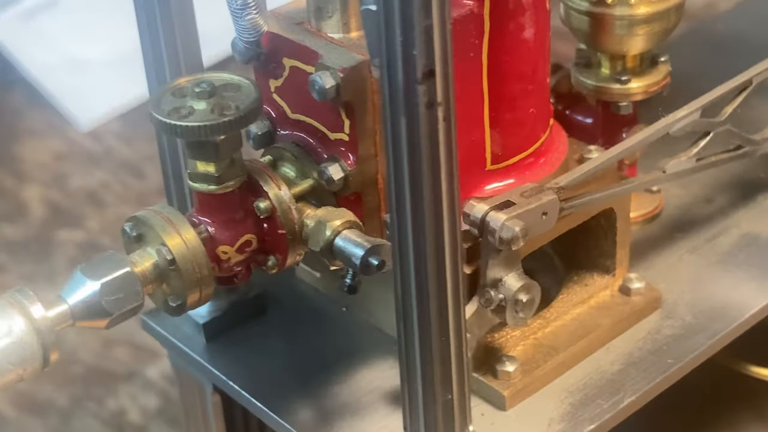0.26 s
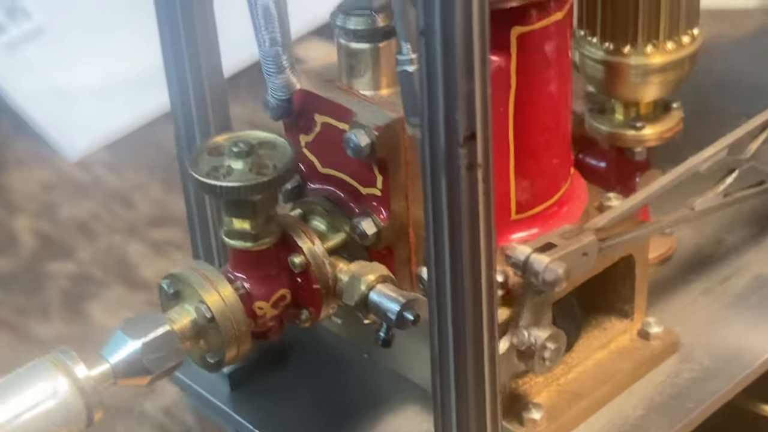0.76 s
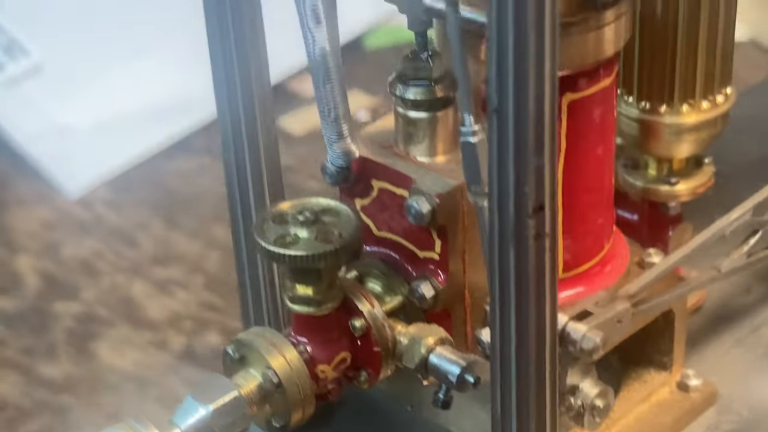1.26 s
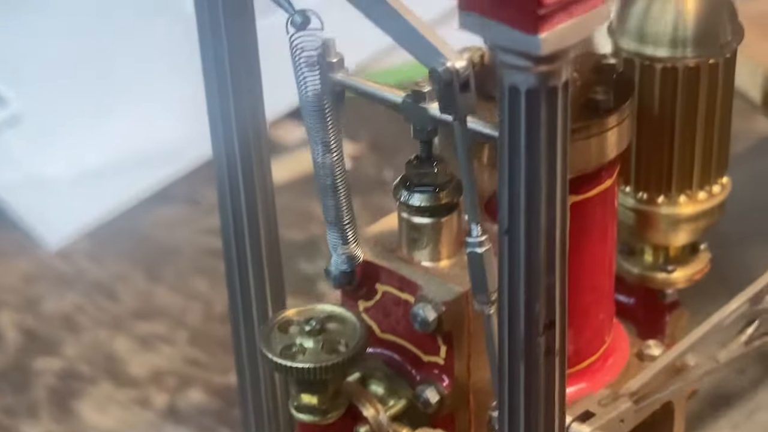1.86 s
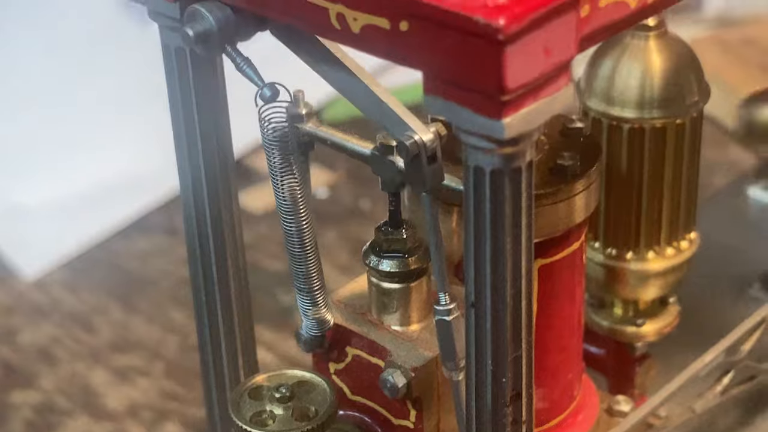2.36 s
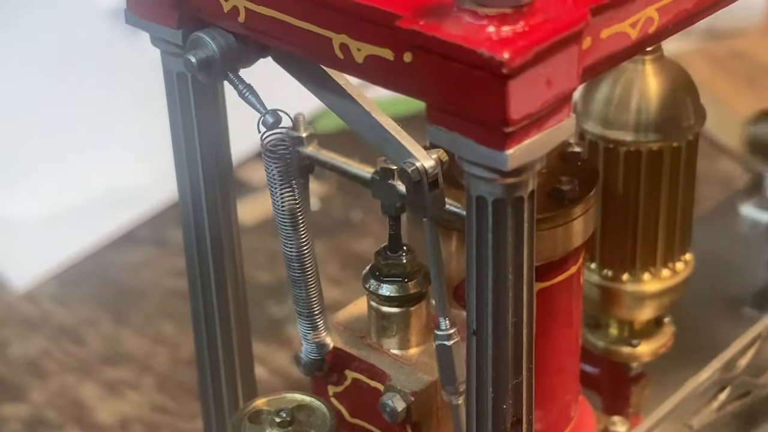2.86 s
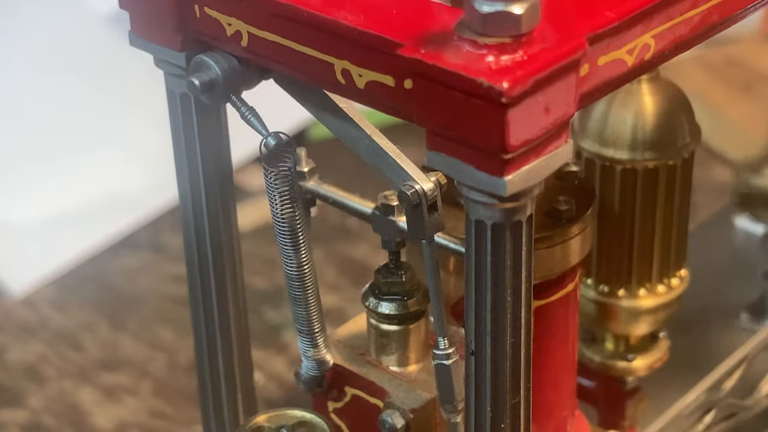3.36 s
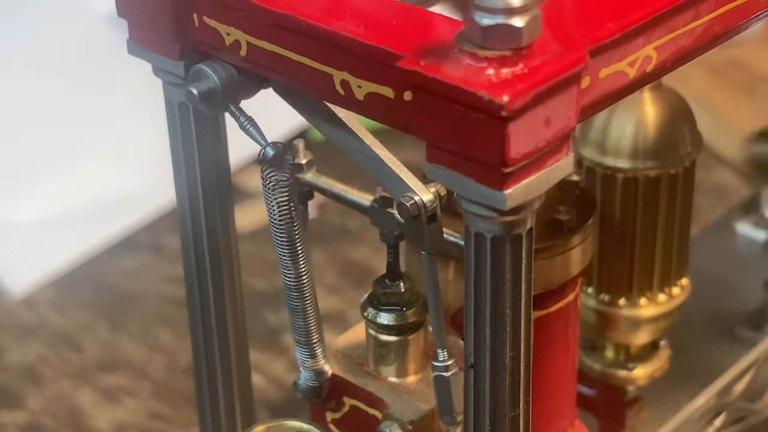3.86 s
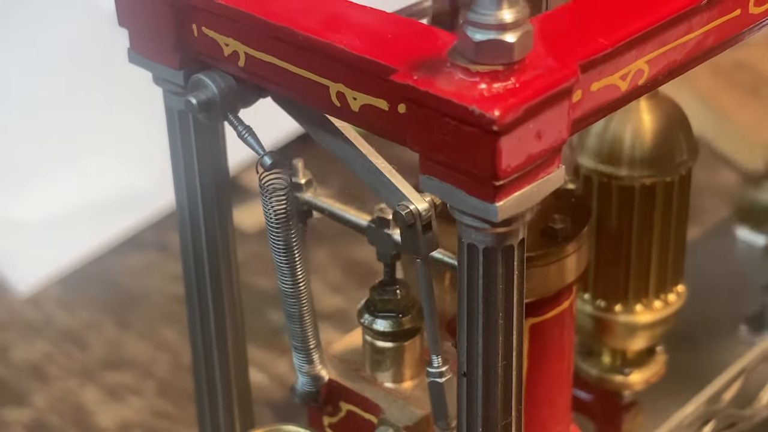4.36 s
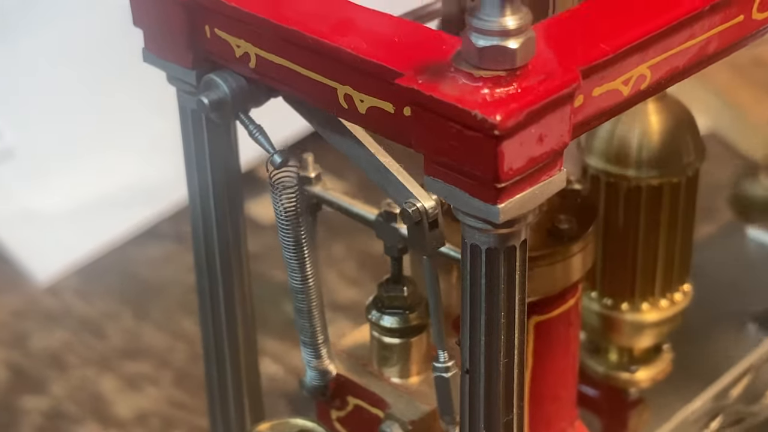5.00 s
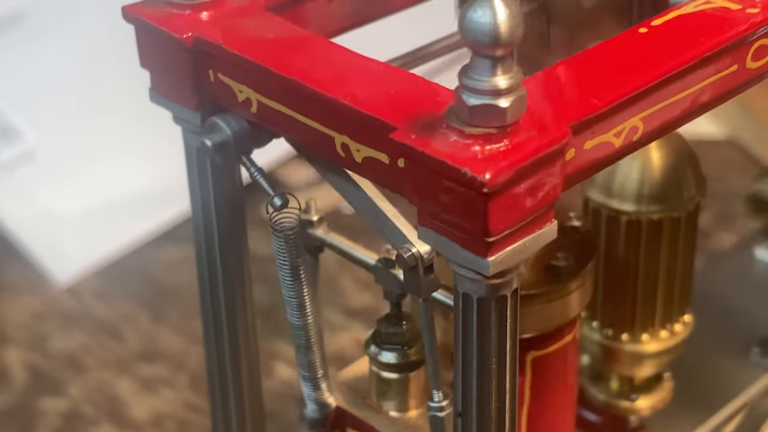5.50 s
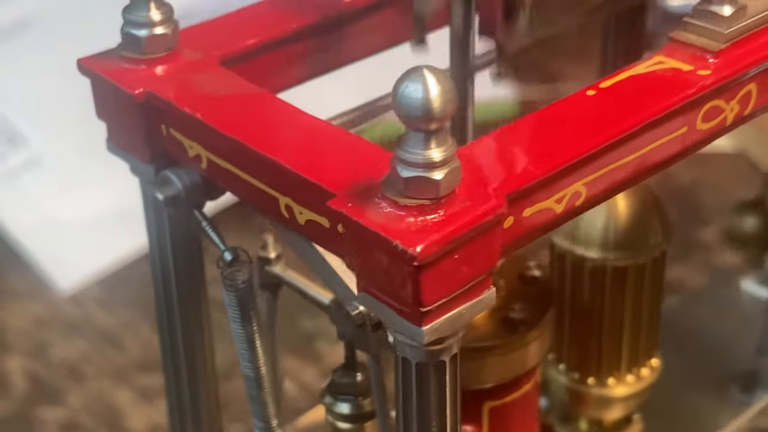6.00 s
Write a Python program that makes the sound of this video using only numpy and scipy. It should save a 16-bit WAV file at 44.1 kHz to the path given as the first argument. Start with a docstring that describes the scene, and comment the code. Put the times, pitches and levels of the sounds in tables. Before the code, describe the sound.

A small model beam engine runs on compressed air on a table indoors. From the start it beats a rapid, even rhythm, each stroke a short hissy puff and a knock of the linkage, heavy and light in turn. Small gears buzz and swell over a soft air leak, a faint whistle and a low electrical hum. One soft, dull thud comes near the end. A phone hears it close up, in stereo.

```python
"""Gears buzz over a soft hiss of leaking air, and at once a small beam engine is puffing and knocking.
It runs on compressed air on a table: at each stroke end the valve lets out a puff and the linkage knocks,
heavy and light in turn. The governor gears swell once a pinion turn. Under it lie a faint whistle, mains
hum and, near the end, one dull thud. A phone held close hears it in stereo, rising slowly along the frame."""
import sys
import numpy as np
from scipy import signal
from scipy.fft import rfft, irfft
from scipy.io import wavfile
from scipy.ndimage import uniform_filter1d

SR = 44100
rng = np.random.default_rng(int(sys.argv[2]) if len(sys.argv) > 2 else 0)


def to_wav(sig):
    """Store sig (one row per channel, or 1-D mono) as 16-bit WAV at the path in sys.argv[1].

    Samples outside -1..1 are clipped; the rate is SR.
    """
    pcm = np.clip(np.atleast_2d(sig), -1, 1) * 32767
    pcm = np.round(pcm).astype(np.int16)
    wavfile.write(sys.argv[1], SR, pcm.T)  # frames by channels


N = 275184
T = np.arange(N) / SR


def undb(db):
    """Gain of a level in dB."""
    return 10 ** (np.asarray(db) / 20)


def level(x, db):
    """Scale to an rms level."""
    return x * undb(db) / np.sqrt(np.mean(x ** 2))


def band(x, hz, width_hz, stages=1):
    """Resonances in series, each width_hz wide with gain 1 at its centre."""
    for _ in range(stages):
        x = signal.lfilter(*signal.iirpeak(hz, hz / width_hz, SR), x)
    return x


def over_hz(table):
    """A curve of (f/Hz, value) read at every FFT bin, straight on a log axis."""
    hz, value = np.transpose(table)
    return np.interp(np.log(np.arange(N // 2 + 1) * SR / N + 1), np.log(hz + 1), value)


def wander(rate):
    """Glides between random values, rate of them a second; spread near 1."""
    hold = int(SR / rate)
    return 1.16 * uniform_filter1d(np.repeat(rng.standard_normal(N // hold + 1), hold), hold)[:N]


# The phone's move up the frame: t/s, height/0-1
PHONE_PATH = [(0, 0.03), (1, 0.25), (2.2, 0.54), (4, 0.51), (6.24, 0.56)]

def height():
    """How far the phone has risen."""
    return np.interp(T, *np.transpose(PHONE_PATH))


# Tone of the hiss and room bed: f/Hz, relative density/dB
HISS_SPECTRUM = [(30, -17.5), (112, -4.5), (394, -11), (512, -4), (1040, -12), (2010, -14), (2830, -12.5),
                 (3580, -16.5), (6050, -19.5), (7670, -16.5), (8980, -81), (10000, -15.5), (12200, -20.5),
                 (13700, -50), (16000, -13.5)]

def air():
    """The bed: leak hiss and room tone, wider in the treble, a faint leak whistle and mains hum."""
    mid, side = rfft(rng.standard_normal((2, N)))
    width = over_hz([(300, 0.47), (1500, 0.95)])
    hiss = irfft(undb(over_hz(HISS_SPECTRUM)) * (mid + width * side * np.array([[1], [-1]])), N)
    hiss = level(hiss, db=-45.5) * undb(height())
    whistle = level(band(rng.standard_normal((2, N)), hz=3530, width_hz=350, stages=2), db=-54.5)
    hum = sum(level(np.sin(2 * np.pi * hz * T), db) for hz, db in [(120, -61.5), (240, -67)])
    return (hiss + hum) * undb(wander(12)) + whistle * undb(3.6 * wander(14))


def crank_turns():
    """Turns made by the crank as the flywheel gathers a little speed and settles."""
    first_s, turn_s, slower_s, settle_turns = .10737, .304292, .0045805, 10.646
    turns = np.arange(-1, N / SR / turn_s + 1)
    lag_s = slower_s * settle_turns * (1 - np.exp(-turns / settle_turns))
    return np.interp(T, first_s + turn_s * turns + lag_s, turns)


TEETH_A_TURN, PINION_TEETH = 42.467, 30
# Ring of the governor gears and their bracket:
# f/Hz, nominal width/Hz, relative density/dB, half the swell/dB, lift per unit height/dB
BRACKET_MODES = [(586, 59, -0.5, 4.5, -2.5), (711.4, 29, 5, 4, -1), (797, 38, 2, 3, 1.5),
                 (957, 61, -4.5, 5, 1), (1193, 74, -2, 7, 0.5), (1340, 46, 1.5, 4, 0.5),
                 (1705, 141, -0.5, 2, 3), (1846, 63, -3.5, 1, -3), (1968, 39, -12, 1, -1),
                 (2473, 62, -8, 4, -0.5), (4496, 204, -3.5, 5, -6.5), (4676, 112, -6, 8, -1),
                 (4925, 45, -0.5, 25, 2.5), (5500, 240, -4, 7.5, -1), (7500, 1050, -14.5, 3.5, 4.5),
                 (8350, 155, -9.5, 4.5, 8.5), (10700, 600, -10.5, 3.5, -8.5)]

def gears():
    """Each tooth clicks and scrapes into mesh; the off-centre pinion binds once a turn."""
    turn = crank_turns()
    surge = .2 * np.sin(2 * np.pi * (turn - .9))  # the crank surges once a turn
    tooth = TEETH_A_TURN * turn - .15 + surge
    pinion_turn = turn * TEETH_A_TURN / PINION_TEETH
    binding = np.tanh(3.1 * np.cos(2 * np.pi * (pinion_turn - 0.44))) - 1  # 0 tight, -2 free
    count = np.floor(tooth).astype(int)
    click = 14 * np.diff(count, prepend=count[0])
    bite = undb(1.4 * rng.standard_normal(count.max() - count.min() + 1))[count - count.min()]
    scrape = (0.77 + 2.2 * np.exp(-(tooth % 1) / 0.18)) * rng.standard_normal(N)
    from_slack = (2 * turn + 0.012 + .5) % 1 - .5  # the mesh eases just ahead of each stroke end
    mesh = bite * (click + scrape) * undb(-4 * np.exp(-(from_slack / 0.21) ** 2))
    buzz = 0
    for hz, width, db, swell_db, lift_db in BRACKET_MODES:
        ring = band(mesh * undb(swell_db * binding), hz, 2.25 * width, stages=2)
        buzz = buzz + undb(db + lift_db * height()) * level(ring, 10 * np.log10(width))
    return level(buzz, db=-41)


# Cue list of stroke ends, heavy and light in turn: t/s, knock gain/dB, puff gain/dB,
# puff peak ahead of the knock/ms, puff length/ms, boost of the two lowest exhaust bands/dB
STROKE_CUES = [(0.1076, -15.0, -26.5, 10.4, 15, 0.3), (0.2615, -23.5, -24.5, 13.4, 10.7, 0),
               (0.4159, -15.5, -25, 10.2, 14.6, 0), (0.5711, -23, -24.5, 12.6, 12, 3),
               (0.7242, -15, -25.5, 9.7, 14.3, -2), (0.8785, -22, -26.5, 13.6, 12, 1),
               (1.0322, -15, -28.5, 11.8, 17, 2), (1.1864, -22, -23.5, 13.8, 11.2, 1),
               (1.3395, -16, -27, 12.5, 14.6, 0.5), (1.4944, -22.5, -25.5, 14, 11, 3),
               (1.6477, -15.5, -27.5, 9.7, 14.4, 1.5), (1.8011, -23, -27.5, 12.7, 12.7, 1.3),
               (1.9541, -16, -29, 10.6, 17.7, 2), (2.1082, -22.5, -29.5, 13, 12, 6.5),
               (2.2606, -15.6, -31, 10.3, 18, 2), (2.4147, -23, -27.5, 11.8, 12, 4.5),
               (2.568, -15.5, -31, 10.8, 20.3, 8), (2.7213, -22.5, -26, 12.5, 11.2, 4),
               (2.8737, -15.5, -30.5, 10, 19.5, 5), (3.0273, -23, -26.5, 13, 11.6, 6.5),
               (3.18, -16.5, -30.5, 9.9, 17.4, 4), (3.3328, -23, -29, 12.7, 12, 7),
               (3.486, -16, -27.5, 10.6, 13.5, 3.5), (3.6393, -23, -28.5, 13.5, 13.4, 4),
               (3.7914, -15.5, -29.5, 10.6, 17.4, 2), (3.9445, -22.5, -29, 13.7, 15, 5.5),
               (4.0976, -16, -29, 11, 16, 5.5), (4.2508, -24, -26, 12.8, 10.8, 3),
               (4.4032, -15.5, -30, 11, 19, 2.5), (4.5572, -23.5, -26, 12.7, 10, 5.5),
               (4.7089, -16.5, -29.5, 9.4, 13.3, -0.5), (4.8615, -23.5, -27.5, 12.7, 11.5, 1.5),
               (5.0137, -16.5, -29.5, 10.3, 17.5, 1.5), (5.167, -24, -28, 14.3, 15.3, -0.5),
               (5.319, -15.5, -31.5, 9.1, 19, 6), (5.4722, -23.5, -27, 13.5, 12.6, 1.5),
               (5.625, -15.5, -28.5, 11.5, 17.6, 1), (5.7772, -23.5, -27.5, 14, 12.6, 2.5),
               (5.9292, -16, -28.5, 10.4, 17, 3), (6.0826, -25.5, -30, 14, 14.3, 7.5),
               (6.2351, -17, -29, 13, 14.6, 3)]
# Colour of the exhaust passage: f/Hz, width per stage/Hz, level/dB, lift per unit height/dB
EXHAUST_BANDS = [(3976, 1200, -8.5, -3.5), (4374, 520, -15, -2.5), (5790, 2450, -20, 17.5),
                 (8040, 2100, -8.5, 8.5), (8900, 460, -6.5, 5.5), (10200, 1880, 5, -11),
                 (11880, 4100, -7, 7.5), (14950, 1500, -20, 17.5)]

def puffs():
    """Spent air rushes out through the exhaust passage while the valve port opens and shuts."""
    ends_s, *_, low_db = np.transpose(STROKE_CUES)
    attack_share, squareness = 0.34, (1.94, 1.75)  # heavy end, light end
    flow = np.zeros(N)
    for k, (s, _, db, lead_ms, length_ms, _) in enumerate(STROKE_CUES):
        near = slice(int((s - .05) * SR), int((s + .05) * SR))
        ms = (T[near] - s) * 1000 + lead_ms
        edge_ms = length_ms * np.where(ms < 0, attack_share, 1 - attack_share)
        flow[near] += undb(db) * np.exp(-.5 * np.abs(ms / edge_ms) ** squareness[k % 2])
    spurts_db = 1.88 * wander(500)  # turbulence tears the jet into millisecond spurts
    jets = []
    for hz, width, db, lift_db in EXHAUST_BANDS:
        gain = undb(db + lift_db * height() + spurts_db + 0.52 * wander(300))
        jets.append(gain * level(band(rng.standard_normal(N), hz, width, stages=3), 0))
    late_flow = np.interp(T - 0.0013, T, flow)  # the two lowest bands peak after the rest
    low_flow = late_flow * undb(np.interp(T + 0.018, ends_s, low_db))
    return low_flow * sum(jets[:2]) + flow * sum(jets[2:])


def blows(s, db):
    """One impulse at each time."""
    return np.bincount((s * SR).astype(int), undb(db), N)[:N]


# Body of the frame and table: f/Hz, t60/s, signed swing under the heavy knock, light knock, valve tap
FRAME_MODES = [(65, 0.17, -0.057, 0.055, 0.15), (82.2, 0.15, 0.036, -0.044, -0.13),
               (134.3, .17, 0.096, -0.03, 0.049), (190.5, 0.09, 0.047, -0.02, 0.012),
               (266.6, 0.19, -0.038, -0.104, 0.051), (293.9, 0.39, 0.0048, 0.048, 0.061),
               (343, 0.077, 0.047, -0.24, -0.16), (448.7, 0.056, -0.74, 0.17, 0.53),
               (500.6, 0.052, -0.2, -0.79, -0.84), (561.7, 0.03, 0.87, 0.41, 0.55),
               (721.3, 0.14, -0.063, -0.14, 0.076), (771.5, 0.019, -0.74, 0.089, 0.22),
               (906, 0.028, -0.12, -0.11, 0.11), (1155, 0.048, 0.052, -0.11, -0.048),
               (1362, 0.057, 0.084, 0.12, 0.015), (1455, 0.023, 0.133, -0.36, -0.2),
               (1765, 0.028, 0.061, 0.4, -0.22), (1908, 0.014, 0.056, -0.34, -0.017)]

def knocks():
    """Slack in the linkage closes at each reversal; the valve taps softly just before the heavy knock."""
    s, db, *_ = np.transpose(STROKE_CUES)
    tap_lead_s, tap_db, build_cycles = .01736, -10.5, 1.147
    heavy, light = blows(s[::2], db[::2]), blows(s[1::2], db[1::2])
    hits = np.array([heavy, light, blows(s[::2] - tap_lead_s, db[::2] + tap_db)])
    hits = np.r_[hits, hits * rng.standard_normal(N)]  # no two blows land on quite the same spot
    rings = 0
    for hz, t60, *swing in FRAME_MODES:
        delay_s = .0176 * (hz ** -.5 - 2000 ** -.5)  # bending waves carry the low modes more slowly
        t = np.maximum(T[:SR // 2] - delay_s, 0)
        ring = np.sin(2 * np.pi * hz * t) * undb(-60 * t / t60) * (1 - np.exp(-t * hz / build_cycles))
        scatter = .11 * rng.standard_normal() * np.array(swing)
        rings = rings + np.outer(np.r_[swing, scatter], ring)
    return signal.fftconvolve(hits, rings, axes=1)[:, :N].sum(axis=0)


def thud(at_s=6.2, hz=82.8, width_s=0.038, db=-48):
    """One dull thud: a low tone that swells and fades."""
    return undb(db) * np.exp(-.5 * ((T - at_s) / width_s) ** 2) * np.sin(2 * np.pi * hz * T)


def room(x, t60_s=0.091, db=-11.5):
    """Table top and walls return a short diffuse tail, a different one on each side."""
    t = T[:SR // 2]
    tail = rng.standard_normal((2, len(t))) * undb(-60 * t / t60_s) * (t > .003)
    tail = band(tail, hz=2550, width_hz=3800)  # small surfaces return little bass, soft ones little treble
    return signal.fftconvolve(x[None], undb(db) * tail / np.sqrt(np.sum(tail[0] ** 2)), axes=1)[:, :N]


# Stereo balance of the engine: f/Hz, left minus right/dB
BALANCE = [(60, -2.5), (110, -4), (250, 0), (700, -.5), (1290, 2.5), (2380, .5), (4400, 0)]

def stereo(x, phases):
    """Sound takes different paths around the phone to its two microphones; they change as it rises."""
    raised = height() / height().max()
    hz, *leads = np.transpose(phases)
    pair = 0
    for lead, share in zip(leads, (1 - raised, raised)):
        left = undb(over_hz(BALANCE) / 2) * np.exp(.5j * over_hz(np.c_[hz, lead]))
        pair = pair + share * irfft(rfft(x) * np.array([left, 1 / left]), N)
    return pair


# Stereo image of each source: f/Hz, left lead with the phone low/rad, with the phone raised/rad
GEAR_IMAGE = [(1000, .3, .3), (1400, -1, -1), (1550, -2.6, -2.3), (1900, -2, -2), (2100, 0, 0),
              (2650, 2.8, .9), (3600, 1, -3), (4300, -.3, -2.7), (4800, 0, 0), (5200, -1, -2.8),
              (5700, -1.1, -2.8), (6300, 0, -3.2), (7400, 0, 0), (8700, -3.1, -3.1), (11400, -6.3, -6.3)]
PUFF_IMAGE = [(2400, 2.3, .5), (3000, 3.4, 3.4), (3600, 5.3, 4.4), (4800, 6.5, 5.7), (5200, 6, 9),
              (6200, 3.3, 8.5), (6600, 6.3, 6.3), (7500, 5.8, 5.2), (8900, 3.2, 3.2), (11200, 0, 0),
              (13500, -3.1, -3.1), (15800, -6.3, -6.3)]
KNOCK_IMAGE = [(30, .55, .55), (500, .3, .35), (1200, -1.3, -1.3), (1700, -.7, -.7)]

def scene():
    """The mix: the engine up close, its short room tail, the air bed and the thud."""
    frame, exhaust, buzz = knocks(), puffs(), gears()
    direct = stereo(buzz, GEAR_IMAGE) + stereo(exhaust, PUFF_IMAGE) + stereo(frame, KNOCK_IMAGE)
    return direct + room(buzz + exhaust / 2 + frame) + air() + thud()


def record(dry, top_hz=15600):
    """The phone cuts the top octave's upper end steeply."""
    return signal.sosfilt(signal.ellip(10, .2, 70, top_hz, fs=SR, output="sos"), dry)


dry = scene()
out = record(dry)
to_wav(out)
```